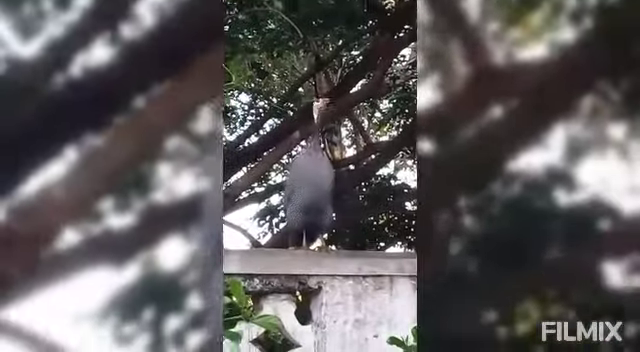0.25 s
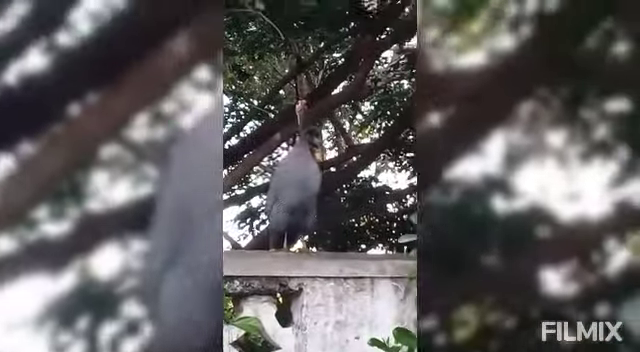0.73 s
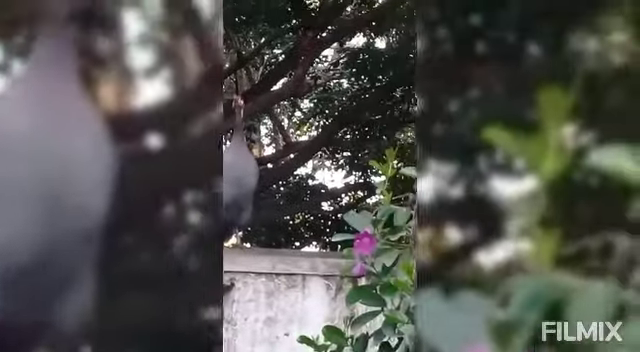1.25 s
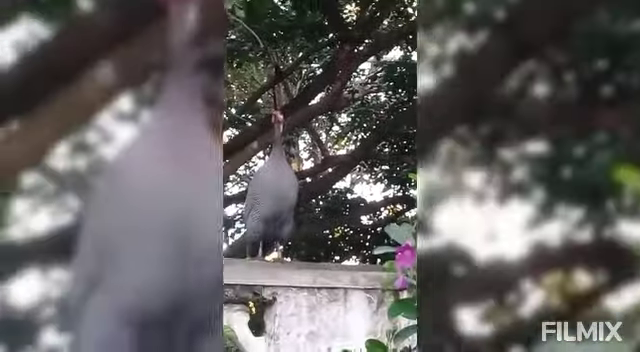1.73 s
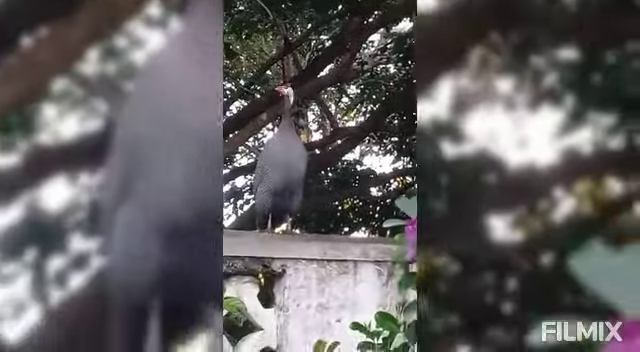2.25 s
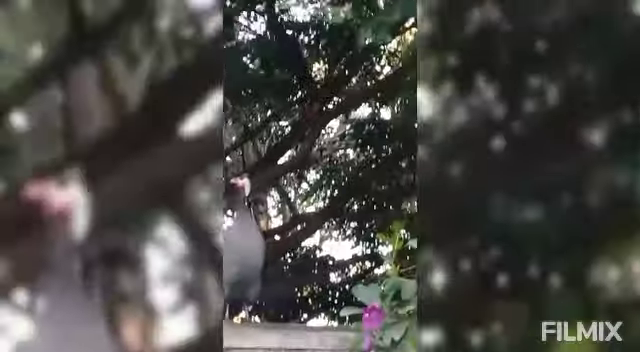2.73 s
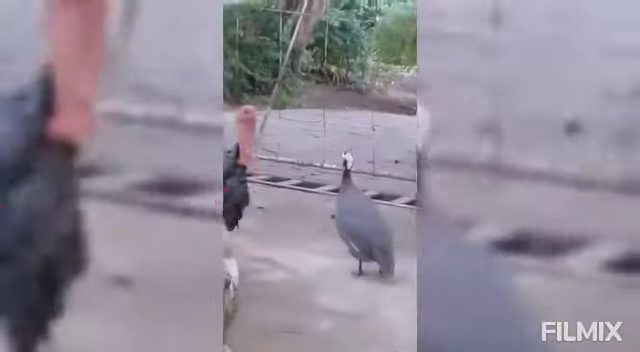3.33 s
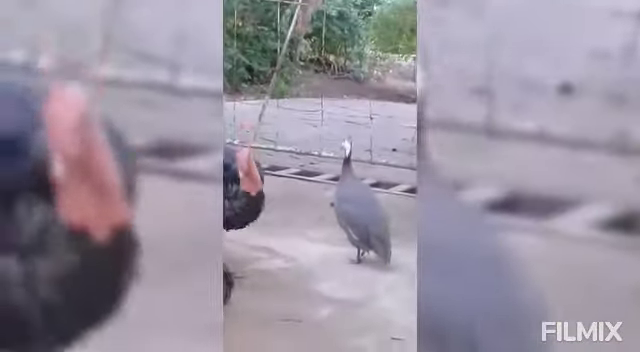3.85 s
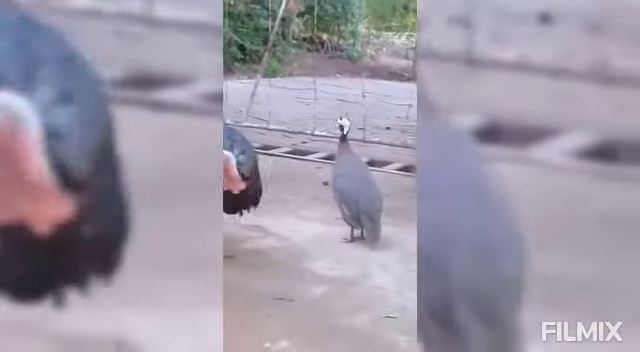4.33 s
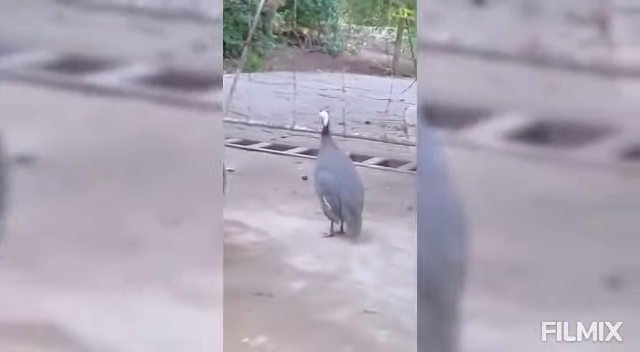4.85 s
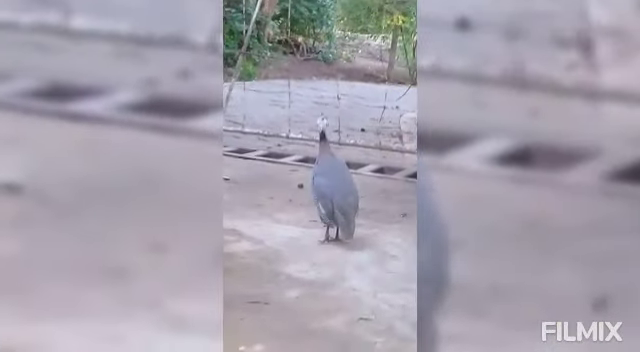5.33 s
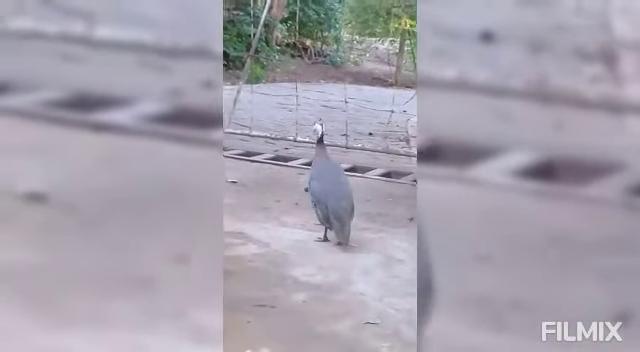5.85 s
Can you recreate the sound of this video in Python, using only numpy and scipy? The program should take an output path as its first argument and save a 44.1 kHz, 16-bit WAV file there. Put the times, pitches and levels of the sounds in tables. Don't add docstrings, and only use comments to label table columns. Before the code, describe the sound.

The sound opens on the loud tail of a guineafowl cackle at 0 s. A small squeak leads to a short buzzing rasp near 0.3 s, a longer, brighter, harsher cackle fills 0.45-0.63 s, then a short rasp comes at 0.9 s and a final squeak and rasp at 1.03-1.2 s, with slight wall echo and feather rustle. The calls stop. Faint insect hiss, leaves and far traffic hum remain. Breathy distant clucks come from 1.3 s, strongest around 2.5-2.6 s, with thin turkey whistles and small gliding chirps. A sharp finger tick snaps at 2.37 s, a thinner one at 2.87 s. From 2.9 s low wind rumbles on the microphone; the background shifts at 3.15 s. Far chirps continue, a turkey warbles into a clear peep at 3.8-3.95 s, and a dull knock lands at 4.4 s. Hoarse yelps cluster at 5.15-5.4 s, as stronger fluttering gusts run to the end.

```python
import sys
import numpy as np
from scipy import signal
from scipy.fft import rfft, irfft
from scipy.io import wavfile
from scipy.ndimage import uniform_filter1d

SR = 44100
rng = np.random.default_rng(int(sys.argv[2]) if len(sys.argv) > 2 else 0)


def elevation(decibels):
    levels = np.asarray(decibels, float)
    return 10 ** (levels / 20)


def to_wav(sig):
    pcm = np.clip(np.atleast_2d(sig), -1, 1) * 32767
    pcm = np.round(pcm).astype(np.int16)
    wavfile.write(sys.argv[1], SR, pcm.T)


N = 268569
t = np.arange(N) / SR

# t/s, level/dB, beak opening/0-1, air pressure/0-1
RASPS = [
    [(0.0, -14, 0.9, 0.6), (0.032, -20.5, 0.37, 0.6), (0.07, -30.5, 1, 0.23)],
    [(0.286, -39, 0.15, 0.36), (0.324, -20.5, 0.03, 0.5), (0.336, -23.5, 0.1, 0.52), (0.366, -40.5, 0, 0.5)],
    [(0.448, -45, 0.5, 0.84), (0.463, -13.5, 0.2, 0.2), (.495, -21, 0.3, 0.59), (0.524, -16.5, 0.95, 0.87),
     (.543, -18, 0, 0.72), (.565, -15.5, 0.3, 1), (0.578, -13, 0.97, 0.49), (0.63, -28, 1, 0.7)],
    [(0.886, -33, 0, 0.4), (0.904, -24, 0.32, 0.2), (0.928, -21, 0.32, 0.69), (0.976, -43.5, 0.55, 0.8)],
    [(1.058, -34.5, 0.2, 0.6), (1.065, -18, 0.32, 0.35), (1.078, -16, 0.4, 0.2), (1.105, -15.5, 1, 0.33),
     (1.135, -17, 0.59, 0.34), (1.19, -30.5, 0.23, 0.23)],
]
# t/s, pitch f/Hz, roughness/0 clear-1 noise, mouth resonance f/Hz, beak resonance f/Hz
SYRINX = [
    [(0, 320, .22, 2880, 4450), (.03, 314, .22, 2880, 4450), (.07, 318, .25, 2240, 4450)],
    [(.285, 302, .3, 2800, 4750), (.31, 309, .12, 2170, 4720), (.335, 312, .15, 2170, 4720),
     (.365, 304, .3, 2500, 4600)],
    [(.45, 317, .25, 3400, 5300), (.459, 329, .12, 3500, 5300), (.468, 333, .08, 3600, 4850),
     (.495, 341, .15, 3300, 4900), (.503, 343, .3, 3500, 4200), (.518, 344, .1, 3100, 4480),
     (.545, 345, .07, 2760, 4490), (.56, 345, .08, 3800, 4490), (.570, 345, .1, 3800, 4490),
     (.580, 324, .35, 3830, 4450), (.597, 316, .45, 3800, 4450), (.63, 312, .45, 3100, 4450)],
    [(.885, 304, .3, 2870, 4800), (.905, 314, .15, 2850, 4800), (.915, 314, .12, 2200, 4800),
     (.935, 321, .12, 2890, 4800), (.975, 318, .3, 2870, 4700)],
    [(1.06, 308, .35, 2900, 4900), (1.068, 316, .25, 2850, 4900), (1.075, 319, .2, 2600, 4900),
     (1.095, 317, .1, 2540, 4900), (1.105, 317, .08, 2540, 4450), (1.125, 318, .07, 2540, 4450),
     (1.14, 318, .08, 2540, 4450), (1.155, 317, .2, 2300, 5100), (1.19, 312, .55, 2300, 4600)],
]
# f/Hz, level/dB
WIDE_TRACT = [(180, -52), (300, -22), (620, -21), (1250, -11.5), (1940, -8), (2740, -10.5), (3340, -17),
              (4500, -21), (5860, -17.5), (6580, -37.5), (8860, -49), (9630, -59), (11500, -37),
              (15500, -46.5)]
# f/Hz, level/dB
NARROW_TRACT = [(180, -47), (300, -17), (501, -28.5), (1490, -11), (2930, -10.5), (4010, -18.5),
                (4810, -11.5), (5580, -12), (6690, -39), (9310, -36), (11400, -29), (12300, -43.5),
                (15500, -44)]
# f/Hz, level/dB
LONG_TRACT = [(180, -42), (300, -17), (484, -44), (685, -22), (1180, -18.5), (1670, -2), (2790, -4),
              (4580, -3), (5250, 0), (7390, -24.5), (9470, -36), (11900, -28.5), (15500, -28.5)]
MOUTH_LIFT_DB = [8.0, 4.0, 13, 8.0, 8.5]
THROAT_HZ = (1510, 1980)
AIR_WIDE_HZ, AIR_NARROW_HZ = 14000, 11200
BEAK_DB, AIR_DB, CHEST_DB = (-17.5, 4.5), (-33, -11.5), (-33, -35.5)
CHEST_SWELL_DB, CHEST_SWELL_S = 16, 0.046
PULSE_SPREAD_RAD = 2.5

# f/Hz, level/dB per Hz
GARDEN = [(120, -22), (200, -14.5), (273, -13.5), (525, -33.5), (586, -38), (703, -33.5), (1210, -37.5),
          (1480, -31), (2510, -28.5), (2910, -29.5), (7230, -16.5), (8520, -30), (10500, -40), (15500, -34)]
# t/s, level/dB
LEAVES = [(1.45, -78.5), (1.52, -82.5), (1.96, -85), (1.99, -80.5), (2.48, -78.5), (2.75, -83), (2.91, -71),
          (4.14, -72), (4.55, -69), (4.87, -73.5), (5.31, -70), (5.7, -71)]
LEAVES_MEAN_DB = -73
GARDEN_DB, UPPER_DB = -72, -75.5
INSECTS_DB, INSECTS_FOLLOW = -67, 0.39
HISS_DB, HISS_FOLLOWS = -80, 0.13
HISS_HELD_DB, HISS_BACK_S = -18.5, 0.64
MURMUR_GARDEN_DB, MURMUR_YARD_DB, MOVE_S, MOVE_LASTS_S = -66.5, -71.5, 3.15, 0.089
# f/Hz, level/dB per Hz
HUM = [(15, -59), (25, -15.5), (96, 1.5), (135, -6), (186, -5.5), (750, -31), (1050, -30), (1200, -34.5),
       (1560, -49), (2640, -120)]
HUM_DB = -59.5

# t/s, peak
# level/dB, lowest f/Hz, highest f/Hz, length/s
RUSTLES = [(0.202, -42.5, 2874, 3620, 0.013), (0.24, -35, 2462, 3570, 0.1), (0.857, -44, 2113, 3575, 0.055),
           (1.294, -48, 1290, 3400, 0.13), (1.318, -52, 4500, 6100, 0.088), (1.555, -50.5, 300, 880, 0.058),
           (1.527, -60, 1196, 2650, 0.12), (2.372, -54, 253, 800, 0.021), (2.866, -47, 500, 3530, 0.0039),
           (2.499, -61, 4000, 7430, 0.086), (2.618, -62, 4000, 6000, 0.094),
           (4.388, -48.5, 614, 2230, 0.021), (4.394, -57, 2920, 4550, 0.011),
           (4.75, -57, 2420, 4260, 0.045), (0.243, -62.5, 9490, 12600, 0.066),
           (0.633, -61, 10380, 15070, 0.072), (0.764, -75.5, 8900, 15340, .07),
           (1.038, -56.5, 8360, 12100, 0.05), (2.99, -73, 13000, 14610, .18),
           (3.404, -77, 14300, 15810, 0.21), (5.152, -71.5, 13040, 15380, 0.077),
           (5.311, -53.5, 1900, 5000, 0.035), (5.722, -55, 1514, 5000, 0.052)]
# t/s, length/s, start f/Hz, end f/Hz, level/dB
SQUEAKS = [
    (.218, 0.058, 1340, 1436, -44),
    (.438, 0.069, 1344, 1366, -41.5),
    (.838, 0.054, 1022, 1145, -49),
    (1.032, 0.048, 1400, 1480, -34),
]
SQUEAK_PARTIALS_DB = [(0, 0.5, 3, -16), (0, -3.5, -16, -25), (0, -2, -15, -19.5), (3, -1, -27, -16.5)]
# share of length/0-1, share of glide/0-1, level/dB, extra overtone level/dB
SQUEAK_SHAPE = [(0, 0.042, -32, 1), (.25, 0.12, -6.5, 8.5), (0.549, 0.7, 2.5, -3.5),
                (0.998, 0.82, -6.5, -2)]
# t/s, length/s, start f/Hz, end f/Hz, level/dB
WHINES = [(.288, 0.044, 1560, 1505, -31.5), (.325, 0.034, 1447, 1388, -33.5),
          (.888, 0.039, 1535, 1495, -30.5), (.935, 0.023, 1502, 1490, -32), (1.061, .04, 1481, 1515, -21.5),
          (.455, 0.052, 4767, 4980, -30), (.497, 0.033, 4200, 4265, -26), (.535, 0.042, 2066, 2034, -24)]
# t/s, peak level/dB, lowest f/Hz, highest f/Hz, length/s
CLUCKS = [(1.287, -55.5, 245, 896, 0.13), (1.987, -64.5, 940, 3370, 0.14), (2.493, -41.5, 640, 2560, 0.073),
          (2.62, -42, 624, 2550, 0.064), (2.659, -56, 302, 984, 0.19), (2.825, -55, 1126, 3120, 0.09),
          (2.887, -53, 1300, 3180, 0.088), (2.991, -63, 499, 1020, 0.068), (5.586, -56.5, 801, 2660, 0.01),
          (5.718, -60.5, 797, 1210, 0.019), (5.928, -65.5, 688, 1304, 0.025)]
# f/Hz, width f/Hz, level/dB
CLUCK_THROAT = [
    (900, 160, 6),
    (1500, 200, -3),
    (2300, 600, -3),
]
CLUCK_THROAT_DB, RUSTLE_THROAT_DB = -7, -22
BARK_HZ, BARK_DB = 71.9, 3
HEAD_DB, HEAD_S = 4.0, 0.012

# t/s, length/s, start f/Hz, end f/Hz, level/dB
WHISTLES = [(1.72, 0.086, 1643, 1752, -69), (2.15, 0.23, 1854, 1788, -68.5), (2.39, .11, 1810, 1780, -71),
            (2.05, 0.037, 1050, 1053, -70), (2.9, 0.092, 1830, 1750, -63), (3.05, 0.16, 1865, 1645, -72),
            (4.02, .3, 1448, 1542, -64), (4.36, 0.23, 1510, 1482, -71), (4.55, 0.42, 1503, 1487, -83)]
# t/s, length/s, start f/Hz, end f/Hz, level/dB
WARBLES = [
    (3.808, .087, 1013, 1168, -43.5),
]
# t/s, length/s, start f/Hz, end f/Hz, level/dB
PEEPS = [
    (3.946, 0.026, 1042, 1310, -39),
]
# t/s, length/s, start f/Hz, end f/Hz, level/dB
YELPS = [(5.148, 0.019, 926, 888, -50), (5.163, 0.044, 1040, 1052, -47.5), (5.203, 0.041, 1048, 1130, -53),
         (5.282, 0.031, 1029, 1200, -48.5), (5.305, 0.017, 1102, 1120, -44),
         (5.357, 0.0187, 992, 1254, -43.5), (5.335, 0.025, 926, 793, -56), (5.39, 0.018, 1200, 1070, -55)]
YELP_OCTAVE_DB = [-30, -20, -27, -15, -21, -11.5, -30, -21]
# share of length/0-1, share of glide/0-1, level/dB
WHISTLE_SHAPE = [(0, 0.042, -7), (0.347, 0.373, 1), (0.997, 1, -1.5)]
# share of length/0-1, share of glide/0-1, level/dB
WARBLE_SHAPE = [(0, 0.43, -16), (.2, 0.26, -1.5), (.5, 0.007, -9), (0.679, 0.32, -5), (.92, .55, 4.5),
                (1, 0.66, -10)]
# share of length/0-1, share of glide/0-1, level/dB
PEEP_SHAPE = [(0, 0.26, -11), (.35, 0.048, -4), (.6, 0.42, 3), (.8, .8, -23), (1.001, 1, 0)]
# share of length/0-1, share of glide/0-1, level/dB
YELP_SHAPE = [(0, 0.088, -3), (.3, 0.04, -2), (.75, .45, 1.5), (1, 1, -2)]

# t/s, length/s, start f/Hz, end f/Hz, level/dB
NEAR_CHIRPS = [(2.24, 0.094, 3180, 2150, -62), (2.27, .04, 5220, 4920, -68),
               (2.436, 0.027, 2220, 2890, -67), (2.459, 0.075, 2980, 2630, -60.5),
               (2.58, 0.044, 3120, 2840, -65), (2.996, 0.04, 3400, 3300, -60.5)]
# t/s, length/s, start f/Hz, end f/Hz, level/dB
FAR_CHIRPS = [(3.25, 0.096, 3110, 2370, -67), (3.509, 0.11, 3150, 2280, -74),
              (3.27, 0.082, 3460, 2740, -75), (3.29, 0.095, 2650, 2274, -81), (3.6, 0.099, 2480, 2270, -80),
              (3.76, .09, 3515, 3260, -73), (3.771, 0.066, 3340, 2840, -79), (4.69, .06, 3640, 3650, -75),
              (4.201, 0.1, 3060, 2330, -71), (4.219, 0.19, 1984, 2100, -70.5),
              (4.348, 0.15, 3740, 2965, -71), (4.628, 0.23, 3315, 3446, -73),
              (4.761, 0.11, 2710, 2480, -74), (4.82, 0.044, 2175, 2160, -75),
              (5.363, 0.15, 3410, 2924, -74.5)]
# t/s, peak level/dB, lowest f/Hz, highest f/Hz, thump level/dB
TICKS = [
    (2.3741, -14.5, 1940, 7750, -36.5),
    (2.869, -36, 4000, 7340, -67),
    (4.385, -30.5, 684, 2200, -54),
    (4.598, -43, 2050, 3100, -44.5),
    (5.736, -43, 1510, 4830, -54),
]
# t/s, peak level/dB, rise per 20 dB/s, fall per 20 dB/s, flutter level/dB
GUSTS = [(3.141, -49.5, 0.12, 0.049, -4), (3.651, -46, 0.092, 0.093, -6.5),
         (3.719, -38.5, 0.11, 0.07, -4.5), (3.87, -43.5, 0.085, 0.1, -7.5), (3.96, -47, .08, .08, -4),
         (4.04, -50, 0.08, .04, -5.5), (4.23, -41.5, .06, 0.062, -14), (4.451, -47, 0.1, 0.044, -4),
         (4.539, -48, 0.058, 0.083, -6.5), (4.709, -58.5, 0.045, .6, -6), (5.07, -40.5, 0.085, 0.3, -4.5),
         (5.251, -33.5, 0.039, 0.028, -9.5), (5.471, -41, 0.058, 0.046, 0),
         (5.503, -33.5, 0.036, 0.03, -3.5), (5.59, -39.5, 0.087, 0.23, 5), (5.655, -31.5, 0.085, 0.26, -3),
         (5.732, -33, 0.097, 0.1, 2.5), (5.778, -34.5, 0.077, 0.076, 1), (5.834, -44, .06, 0.054, 7),
         (5.88, -38.5, 0.077, 0.068, -10), (5.95, -35, 0.088, 0.14, -2), (6.015, -38.5, 0.087, 0.074, -5),
         (6.088, -39, 0.069, 0.11, -7)]
# f/Hz, level/dB per Hz
BUFFET = [(15, -57), (36, -6), (90, 2.5), (150, -5), (239, -19), (401, -35.5), (442, -35.5), (700, -65),
          (910, -93.5), (1540, -120)]
WIND_START_S = 2.9
WALL_T60_S, WALL_DB, FAR_T60_S = 0.36, -10.5, 0.22


def at_hz(points, hz):
    f, db = np.transpose(points)
    return np.interp(np.log(np.maximum(hz, 1)), np.log(f), db)


def unit(x):
    return x / np.sqrt(np.mean(x ** 2) + 1e-20)


def between(ends, share):
    return ends[0] + (ends[1] - ends[0]) * share


def band(x, low_hz, high_hz):
    sos = signal.butter(2, [low_hz, min(high_hz, .45 * SR)], "band", fs=SR, output="sos")
    return signal.sosfilt(sos, x)


def band_twice(x, low_hz, high_hz):
    return band(band(x, low_hz, high_hz), low_hz, high_hz)


def coloured(spectrum):
    gain = elevation(at_hz(spectrum, np.fft.rfftfreq(N + 1, 1 / SR)))
    return unit(irfft(rfft(rng.standard_normal(N + 1)) * gain)[:N])


def wobble(size, rate_hz, count=1):
    sos = signal.butter(2, rate_hz, fs=SR, output="sos")
    slow = signal.sosfilt(sos, rng.standard_normal((count, size + 4000)))[:, 4000:]
    return slow / np.sqrt(1.22 * rate_hz / SR)


def note(rows, edge_s=0.0082):
    s, *columns = np.transpose(rows)
    span = slice(int(max(s[0], 0) * SR), int(s[-1] * SR))
    since_start = t[span] - s[0] + (s[0] < .004)
    edges = np.clip(np.minimum(since_start, s[-1] - t[span]) / edge_s, 0, 1)
    return span, edges, [np.interp(t[span], s, c) for c in columns]


def unfold(events, shape, partials_db):
    notes = []
    for (s, length, start_hz, end_hz, db), mix in zip(events, partials_db):
        rows = []
        for at, glide, step_db, *over_db in shape:
            levels = [db + step_db + p + sum(over_db) * (k > 0) for k, p in enumerate(mix)]
            rows.append((s + at * length, between((start_hz, end_hz), glide), *levels))
        notes.append(rows)
    return notes


def tones(notes, blur, blur_hz):
    out = np.zeros(N)
    for rows in notes:
        span, edges, (hz, *levels_db) = note(rows)
        phase = 2 * np.pi * np.cumsum(hz) / SR
        for k, db in enumerate(levels_db, start=1):
            a, b = wobble(len(hz), blur_hz, count=2) * np.sqrt(blur / 2)
            partial = (np.sqrt(1 - blur) + a) * np.sin(k * phase) + b * np.cos(k * phase)
            out[span] += edges * elevation(db + 3.0) * partial
    return out


def echoes(x, t60, dull_hz):
    lag = t[:SR // 2]
    tail = rng.standard_normal(len(lag)) * elevation(-60 * lag / t60) * np.clip(lag / 0.0065, 0, 1)
    tail = signal.lfilter(*signal.butter(2, dull_hz, fs=SR), tail)
    return signal.fftconvolve(x, tail / np.sqrt(np.sum(tail ** 2)))[:N]


def breathy_bursts(events, throat_db, bark_db, head_db):
    out, age = np.zeros(N), t[:SR // 4]
    for s, db, low_hz, high_hz, length in events:
        burst = rng.standard_normal(len(age)) * elevation(2.6 * wobble(len(age), 130)[0])
        throat = sum(elevation(g) * band(burst, f - w / 2 - 50, f + w / 2 + 50) for f, w, g in CLUCK_THROAT)
        voiced = unit(band_twice(burst + elevation(throat_db) * throat, low_hz, high_hz))
        bark_phase = 2 * np.pi * BARK_HZ * (age - .008) + .5 * wobble(len(age), 26)[0]
        voiced = voiced * elevation(bark_db * np.cos(bark_phase))
        dull = band(voiced, 0.92 * low_hz, np.sqrt(low_hz * high_hz))
        voiced = dull + (voiced - dull) * np.exp(-age / (2.1 * length))
        shape = np.clip(age / (0.04 * length), 0, 1) * np.exp(-(age / length) ** 2)
        shape = shape * elevation(head_db * np.exp(-age / HEAD_S))
        at = int(s * SR)
        out[at:at + len(age)] += (elevation(db - 2.5) * voiced * shape)[:N - at]
    return out + elevation(-6.0) * echoes(out, FAR_T60_S, dull_hz=4000)


def tract_gain(f, tract, resonances, bands):
    shape_db = at_hz(tract, f) + (1.6 + 6.0 * (f > 7000)) * wobble(f.shape[1], 18, count=len(f))
    for centre_hz, width_hz, lift_db in resonances:
        shape_db = shape_db + lift_db / (1 + ((f - centre_hz) / width_hz) ** 2)
    gain = elevation(shape_db)
    for low_hz, high_hz, rel_db in bands:
        inside = (f >= low_hz) & (f < high_hz)
        power = np.sum((gain * inside) ** 2, axis=0) / 2
        gain = np.where(inside, gain * elevation(rel_db) / np.sqrt(power), gain)
    dips_db = -18 / (1 + ((f - 9500) / 550) ** 2) - 8 / (1 + ((f - 7500) / 300) ** 2)
    return gain * (f < 15700) * elevation(-2 * (f > 7000) + dips_db)


def rasps():
    out, k = np.zeros(N), np.arange(1, 50)[:, None]
    tracts = (WIDE_TRACT, NARROW_TRACT, LONG_TRACT, NARROW_TRACT, WIDE_TRACT)
    for rows, voice, tract, mouth_db in zip(RASPS, SYRINX, tracts, MOUTH_LIFT_DB):
        span, edges, (db, opening, pressure) = note(rows)
        size = len(db)
        voice_s, *columns = np.transpose(voice)
        hz, rough, mouth_hz, beak_hz = [np.interp(t[span], voice_s, c) for c in columns]
        jitter = .01 * rough * wobble(size, 60)[0] + .004 * wobble(size, 20)[0]
        phase = 2 * np.pi * np.cumsum(hz * (1 + jitter)) / SR
        f = k * hz

        air_hz = AIR_NARROW_HZ if tract is NARROW_TRACT else AIR_WIDE_HZ
        resonances = [(between(THROAT_HZ, opening), 150, 18 - 7 * opening), (mouth_hz, 170, mouth_db),
                      (beak_hz, 130, 14), (air_hz, 900, 8)]
        joined = np.clip((t[span] - rows[0][0]) / CHEST_SWELL_S + (rows[0][0] < .01), 0, 1)
        chest_db = between(CHEST_DB, pressure) + CHEST_SWELL_DB * joined
        bands = [(200, 1150, chest_db), (1150, 3300, 0), (3300, 9300, between(BEAK_DB, pressure)),
                 (9300, 15700, between(AIR_DB, pressure))]
        gain = tract_gain(f, tract, resonances, bands)

        smear = 1.25 * rough * np.clip(f / 1500, .2, 1) ** 2.5 * np.where(f > 7000, .4, 1)
        delay = 2 * np.pi * f.mean(axis=1, keepdims=True) * .0004 * (f < 3000)
        carrier = k * phase + rng.uniform(0, PULSE_SPREAD_RAD, k.shape) - delay
        side = wobble(size, 140, count=2 * len(k)) / np.sqrt(2)
        noisy = side[::2] * np.sin(carrier) + side[1::2] * np.cos(carrier)
        harmonics = gain * (np.sqrt(1 - smear) * np.sin(carrier) + np.sqrt(smear) * noisy)
        out[span] += elevation(db - 4.5) * edges * np.sum(harmonics, axis=0)
    return out


def background():
    leaves_db = np.interp(t, *np.transpose(LEAVES))
    swing_db = leaves_db - LEAVES_MEAN_DB
    throb_db = 2.1 * np.cos(2 * np.pi * 2.9 * (t - 3.15))
    insects_db = INSECTS_DB + INSECTS_FOLLOW * swing_db + throb_db
    hiss_db = HISS_DB + HISS_FOLLOWS * swing_db + HISS_HELD_DB * (t < HISS_BACK_S)
    moved = np.clip((t - MOVE_S) / MOVE_LASTS_S, 0, 1)
    murmur_db = between((MURMUR_GARDEN_DB, MURMUR_YARD_DB), moved)
    garden_db = GARDEN_DB + .3 * (murmur_db - MURMUR_GARDEN_DB)
    bands = [(300, 950, murmur_db), (950, 2900, garden_db), (2900, 5000, leaves_db),
             (5000, 6300, UPPER_DB), (6300, 7950, insects_db), (8800, 15800, hiss_db)]
    air, out = coloured(GARDEN), elevation(HUM_DB) * coloured(HUM)
    for low_hz, high_hz, db in bands:
        out += unit(band_twice(air, low_hz, high_hz)) * elevation(db + 0.28 * wobble(N, 2.4)[0])
    return out


def rustles():
    return breathy_bursts(RUSTLES, RUSTLE_THROAT_DB, bark_db=0, head_db=0)


def squeaks():
    return tones(unfold(SQUEAKS, SQUEAK_SHAPE, SQUEAK_PARTIALS_DB), blur=.2, blur_hz=120)


def whines():
    return tones(unfold(WHINES, WHISTLE_SHAPE, [[0]] * len(WHINES)), blur=.1, blur_hz=80)


def clucks():
    return breathy_bursts(CLUCKS, CLUCK_THROAT_DB, bark_db=BARK_DB, head_db=HEAD_DB)


def turkey():
    whistles = tones(unfold(WHISTLES, WHISTLE_SHAPE, [[0]] * len(WHISTLES)), blur=.3, blur_hz=50)
    clear = unfold(WARBLES, WARBLE_SHAPE, [[0]]) + unfold(PEEPS, PEEP_SHAPE, [[0]])
    hoarse = unfold(YELPS, YELP_SHAPE, [[0, db] for db in YELP_OCTAVE_DB])
    return whistles + tones(clear, blur=.015, blur_hz=50) + tones(hoarse, blur=.08, blur_hz=90)


def chirp_glides(birds):
    return [[(s, a, db + 1.5), (s + 0.36 * d, 0.57 * a + 0.39 * b, db), (s + d, b, db - 3.5)]
            for s, d, a, b, db in birds]


def chirps():
    near = tones(chirp_glides(NEAR_CHIRPS), blur=.35, blur_hz=80)
    far = tones(chirp_glides(FAR_CHIRPS), blur=.55, blur_hz=190)
    returns = echoes(elevation(-9) * near + far, FAR_T60_S, dull_hz=6000)
    return elevation(0.5) * near + elevation(-5.0) * far + returns


def ticks():
    out, age = np.zeros(N), t[:int(.06 * SR)]
    click = (age == 0) + .6 * (np.arange(len(age)) == 11)
    for s, db, low_hz, high_hz, thump_db in TICKS:
        snap = band_twice(click, low_hz, high_hz)
        snap = snap / np.abs(snap).max() + elevation(-22.5) * band(click, 1.55 * high_hz, 2.2 * high_hz)
        rustle = unit(band(rng.standard_normal(len(age)), 1.3 * low_hz, 0.88 * high_hz))
        rustle = elevation(-32) * rustle * np.exp(-((age - .013) / 0.011) ** 2)
        thump_shape = age / .012 * np.exp(1 - age / 0.0088)
        thump = -elevation(thump_db) * np.sin(2 * np.pi * 90 * age) * thump_shape
        out[int(s * SR):int(s * SR) + len(age)] += elevation(db) * (snap + rustle) + thump
    return out


def wind():
    span, out = slice(int(WIND_START_S * SR), N), np.zeros(N)
    now = t[span]
    edges = np.clip((now - WIND_START_S) / 0.2, 0, 1)
    push = coloured(BUFFET)
    for low_hz, high_hz, flutters in [(45, 150, 0), (110, 1000, 1)]:
        db = np.max([peak_db + flutters * flutter_db - 20 * np.maximum((s - now) / rise, (now - s) / fall)
                     for s, peak_db, rise, fall, flutter_db in GUSTS], axis=0)
        part = unit(band(push, low_hz, high_hz))[span]
        part = part / np.sqrt(uniform_filter1d(part ** 2, size=1500) + 0.11)
        part = unit(part * elevation(1.18 * wobble(len(db), 18.0)[0]))
        out[span] += part * edges * elevation(db + 2.0)
    return out


def scene():
    fowl = rasps() + squeaks() + whines()
    stirred = fowl * (.9 + .38 * wobble(N, 110)[0])
    near = fowl + elevation(WALL_DB) * echoes(stirred, WALL_T60_S, dull_hz=5000)
    air = background() + rustles()
    calls = turkey()
    yard = calls + elevation(-15.5 + 2.8 * wobble(N, 60)[0]) * echoes(calls, FAR_T60_S, dull_hz=5000)
    return (near + air + clucks() + yard + chirps() + ticks() + wind())[None]


def roll_off(x):
    return signal.sosfilt(signal.butter(12, 15830, fs=SR, output="sos"), x)


def record(dry):
    mix = 1.1 * np.tanh(dry / 1.1)
    return roll_off(mix)


dry = scene()
out = record(dry)
to_wav(out)
```